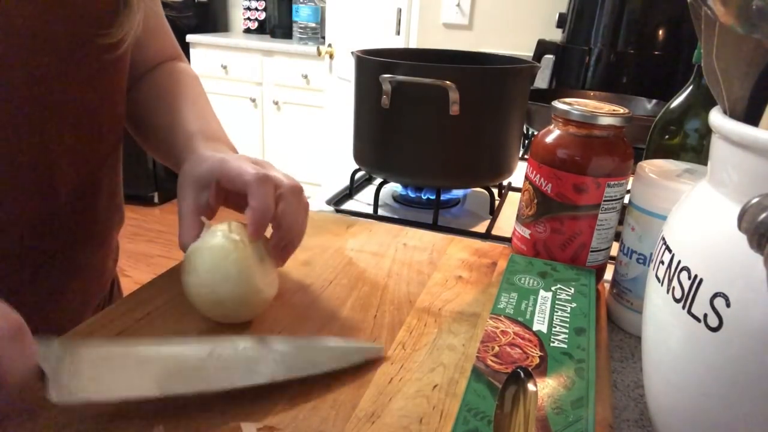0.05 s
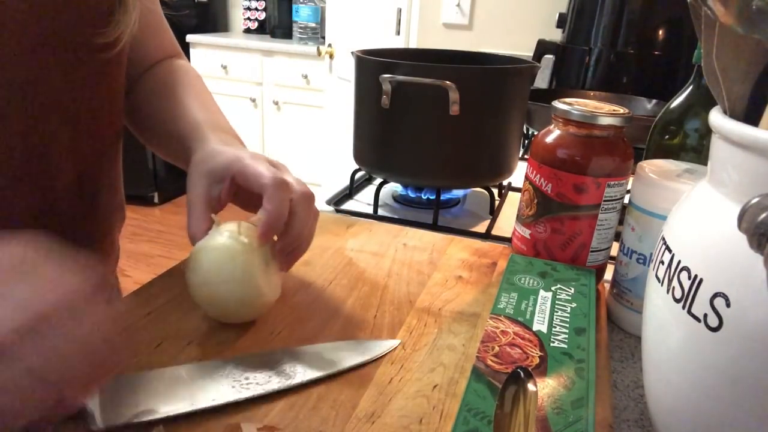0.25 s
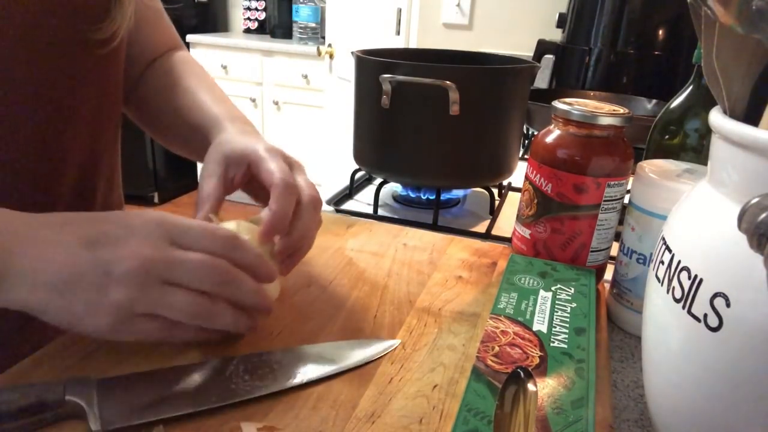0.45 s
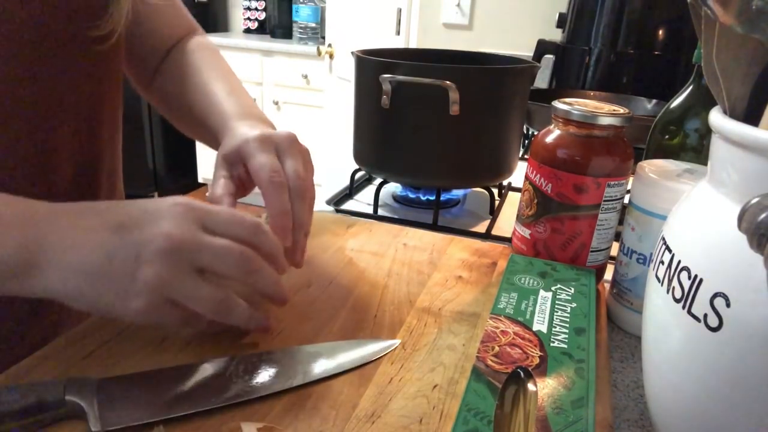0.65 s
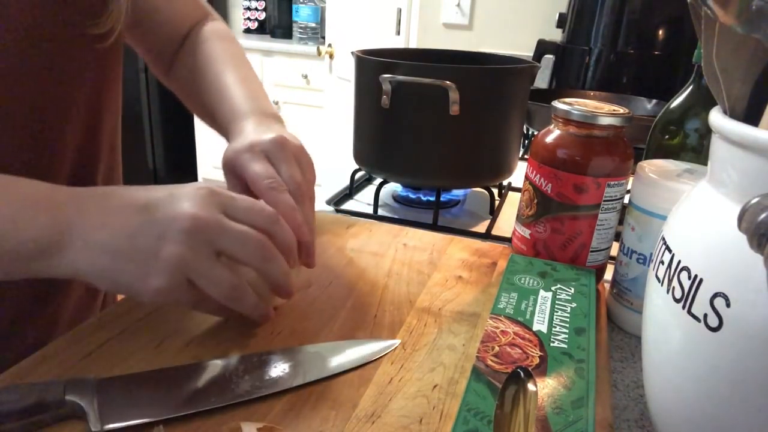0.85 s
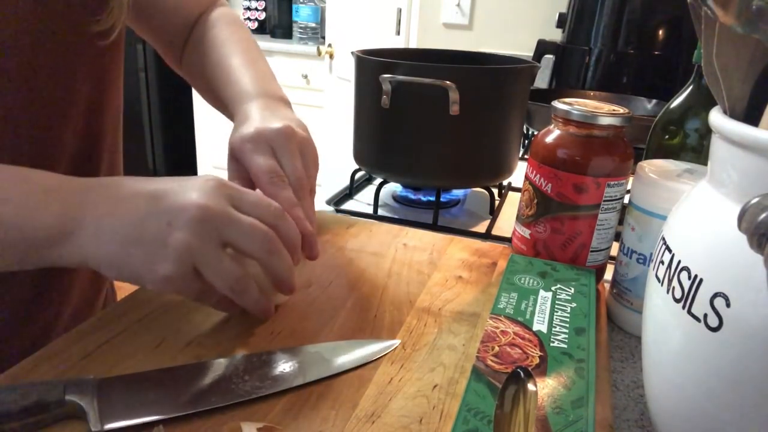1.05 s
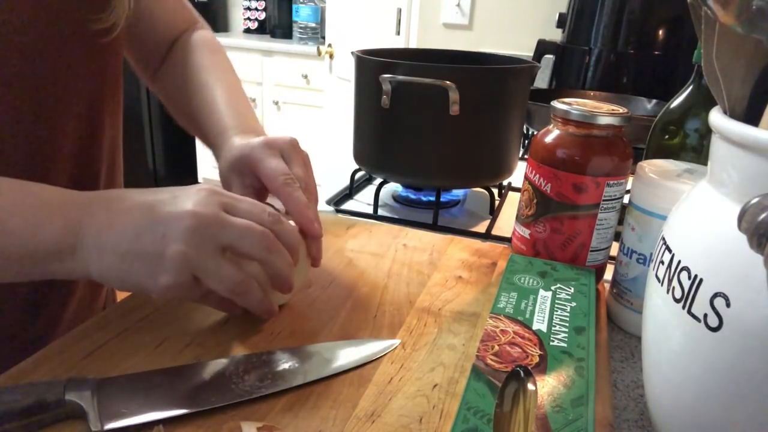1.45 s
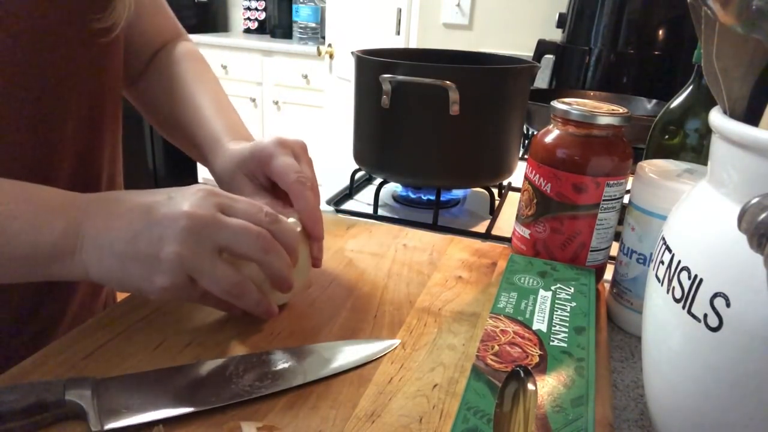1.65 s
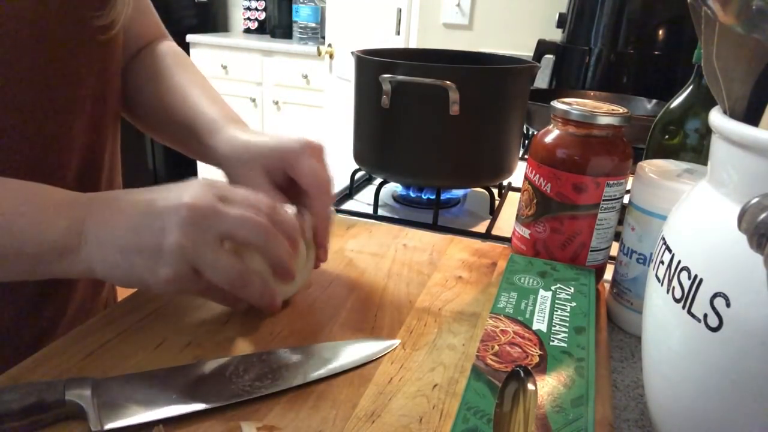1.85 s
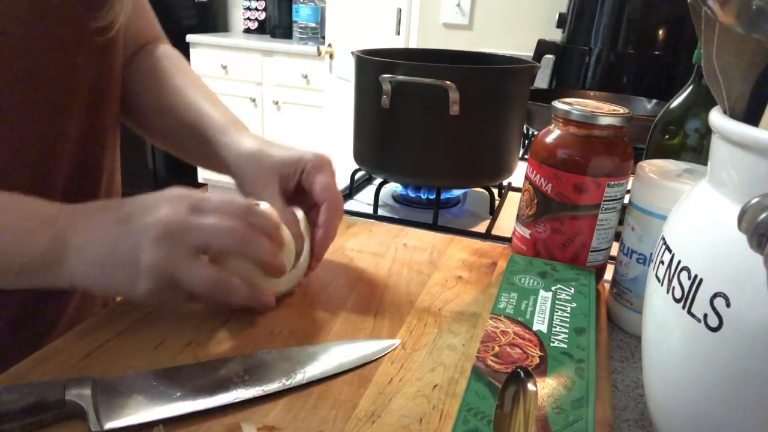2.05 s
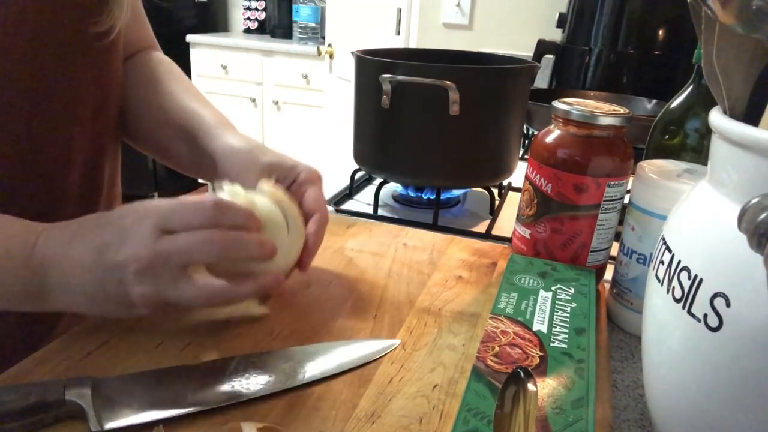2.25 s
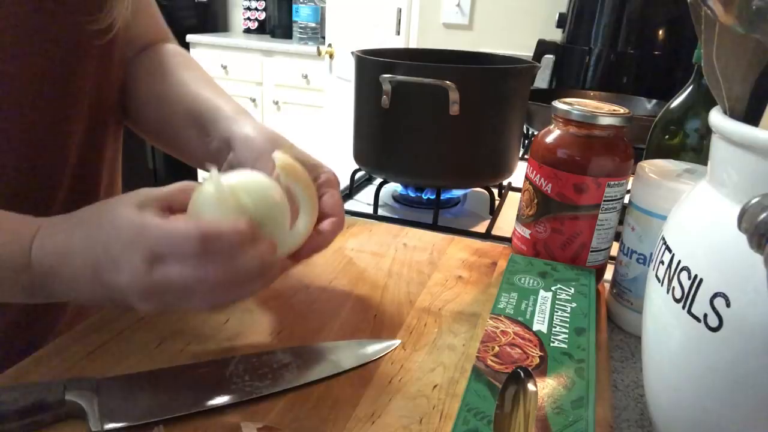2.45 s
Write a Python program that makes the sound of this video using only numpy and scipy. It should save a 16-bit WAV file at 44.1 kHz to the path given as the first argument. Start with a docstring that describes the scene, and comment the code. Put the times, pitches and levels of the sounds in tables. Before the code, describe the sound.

A kitchen knife clacks down on wood, followed by papery onion skin being peeled by hand.

```python
"""A steel kitchen knife ticks its edge on a wooden board, drops flat and rocks to rest, blade ringing.
Each hit layers a noisy clack, a low thud and the dying modes of wood and steel.
Fingers then pick at an onion: the dry skin snaps in tiny cracks, rubs and tears in short runs of
clicks, and the onion bumps dully on the board.
A small kitchen answers, with a low mains hum and a soft rumble behind."""
import sys
import numpy as np
from scipy import signal
from scipy.fft import rfft, irfft
from scipy.io import wavfile

SR = 44100
rng = np.random.default_rng(int(sys.argv[2]) if len(sys.argv) > 2 else 0)


def wav_out(sig):
    """Save sig, one row per channel (or a flat mono array), as 16-bit PCM at SR to the path in sys.argv[1]."""
    wavfile.write(sys.argv[1], SR, np.round(np.clip(np.atleast_2d(sig).T, -1, 1) * 32767).astype(np.int16))


N = 114660

# The edge ticks on the board. Each row: start in seconds, then clack, wood, blade and thud levels in dB.
EDGE_TAPS = [(0.0, -33.5, -30.5, -32, -31.5), (0.0831, -44.5, -31, -43, -42),
             (0.1221, -48, -31.5, -53.5, -42), (0.1508, -32.5, -25, -52.5, -48),
             (0.1558, -35.5, -28.5, -54, -50)]
# The knife drops flat and rocks. Each row: start in seconds, then clack, knock, clink and thud levels
# in dB, and the knock's pitch ratio.
FLAT_DROPS = [(0.2083, -19, -3.5, -28, -35, 1.028), (.2118, -24, -13, -30.5, -42, 0.97),
              (0.2232, -31.5, -32, -21, -30, 0.94), (0.229, -23.5, -3.5, -32.5, -37, .99),
              (0.243, -30, -17, -34.5, -31.5, 0.91)]
# Modes of the board under the edge, then of the knife lying on the board.
# Each row: frequency in Hz, level in dB, T60 in seconds.
TICK_MODES = [(790, -3.5, 0.04), (963, -11, 0.055), (1360, -10, 0.038), (1758, 2.5, 0.026),
              (2267, -7.5, 0.057), (2640, -9.5, 0.1), (2900, -4, 0.0264), (3359, -10.5, 0.047),
              (4573, -3.5, 0.026), (5227, -14, 0.012), (5950, -8.5, 0.043), (7800, -13, 0.064),
              (8330, -10.5, 0.0354)]
KNOCK_MODES = [(305.9, -29.5, 0.26), (603, -21.5, 0.086), (695, -18.5, 0.067), (862.4, -7, 0.085),
               (1054, -20, .04), (1160, -21, 0.047), (1524, -2, 0.037), (1616, -0.5, 0.022),
               (1890, -3.5, 0.025), (2047, -16.5, 0.022), (2614, -25, 0.088), (2860, -21, 0.045)]
# Modes of the steel blade. Each row: frequency in Hz, level ringing free in dB, level slapped flat
# in dB, free T60 in seconds.
BLADE_MODES = [(3451, -22, -12, .3), (4632, -6, -10, .25), (5642, -17, -7.5, .3), (5790, -24, -8.5, .3),
               (6818, -1, -7, .42), (6950, -18, -7, .3), (7195, -22, -8, .3), (8105, -15, -2, .36),
               (8622, -22, -10, .25), (9512, -14, -13, .15), (10402, -24, -17, .2), (11038, -11, -11, .16),
               (12400, -21, -16, .17), (13470, -29, -20, .16), (15520, -30, -26, .1)]
# Tone of the impacts. Each row: frequency in Hz, gain in dB.
CLACK_EQ = [(100, -20.5), (300, -9), (520, 1), (1200, 3), (2800, 0), (4000, -5), (6000, -9), (11000, -13),
            (16000, -21)]  # steel meeting wood
THUD_EQ = [(30, -27.5), (85, 4.5), (170, -3.5), (300, -2.5), (550, -2.5), (900, -11), (2500, -45.5),
           (16000, -74.5)]  # the board's low end
BUMP_EQ = [(60, -20), (250, -9.5), (550, 2.5), (1000, 1), (1800, -2.5), (2400, -14), (5000, -36),
           (16000, -47)]  # onion meeting wood
# The kitchen's decay. Each row: frequency in Hz, T60 in seconds.
REVERB_T60 = [(100, 0.25), (500, 0.44), (1400, 0.61), (3700, 0.56), (8000, 0.55), (16000, .35)]
# Tone of the reverb, dipped at the knife's loudest knock pitches so its tail sounds diffuse.
# Each row: frequency in Hz, gain in dB.
REVERB_EQ = [(60, 6), (620, 4.5), (860, -0.5), (1200, 3.5), (1600, -5), (2300, 1), (8000, -1), (16000, -2)]
# Tone of the background rumble. Each row: frequency in Hz, gain in dB.
RUMBLE_EQ = [(20, -16), (45, -10), (100, 6), (200, -6.5), (330, -3.5), (480, -14), (720, -17.5), (850, -7),
             (1050, -19.5), (2500, -23.5), (8000, -31.5), (16000, -45.5)]
# Partials of the mains hum. Each row: frequency in Hz, rms level in dB.
HUM_PARTIALS = [(59.6, -52.5), (119.4, -62), (179, -64.5), (239, -74), (298, -65)]
# The dry skin snaps. Each row: start in seconds, level in dB, centre in Hz, decay time constant in
# milliseconds, hollow body gain in dB.
SKIN_SNAPS = [(0.4122, -34, 6490, 0.44, 4), (0.5028, -25.5, 9000, 0.47, 0), (0.54, -43, 7490, 0.63, 5),
              (0.6566, -35, 5650, 1.4, 7.5), (0.6665, -41.5, 7600, 1.8, -8), (0.801, -44, 5000, 1.1, 5),
              (0.826, -40.5, 5160, 1.5, -4), (0.8371, -33, 5860, 0.49, -1), (0.8733, -36, 8600, 2.1, 6),
              (0.9117, -35.5, 3900, 0.48, 4), (1.1081, -34, 7840, 2.6, 5.5),
              (1.2194, -35.5, 8370, 1.16, -4), (1.226, -43.5, 11200, 0.63, -3),
              (1.2804, -42.5, 6510, 0.67, 9), (1.2971, -35, 5460, 3.5, 6.5),
              (1.3175, -39.5, 9000, 0.66, -3), (1.4368, -38, 4920, 1.6, 2), (1.494, -29, 7900, 1.5, 5),
              (1.502, -27, 6160, 0.43, -9), (1.5166, -27.5, 6070, 1.3, -5), (1.529, -26, 6770, 1, -12),
              (1.5328, -26.5, 6150, 1.3, 5), (1.538, -24, 6900, 1.2, -11), (1.5528, -30, 6370, 0.51, -16),
              (1.6678, -40, 6070, 1.2, -4), (1.727, -32.5, 5730, 0.87, 2.5), (1.736, -32.5, 6400, 1.4, -7),
              (1.8096, -41.5, 5480, 1.75, 4), (1.8246, -43, 8600, 0.75, -6), (1.8465, -31, 4700, 1.2, -2),
              (1.8562, -23, 8700, 1.4, 1), (1.8739, -26, 3000, 0.66, 14), (1.8764, -19, 5600, 0.84, -7),
              (1.895, -28.5, 11000, 1.8, -16), (1.9007, -22.5, 6600, 0.36, -22),
              (1.9049, -25.5, 5040, 1, 3), (1.9144, -28, 4550, 0.99, 6), (1.935, -23.5, 11000, 0.6, -10),
              (1.9617, -33, 7000, 0.69, -2), (1.9727, -30, 6600, 0.52, -7), (1.9762, -28, 8850, 1.8, -4),
              (2.0037, -31, 7060, 0.51, -11), (2.0167, -29.5, 6030, 0.75, 0),
              (2.0555, -27.5, 6840, 0.94, -1), (2.0949, -34.5, 5560, 1.7, 0), (2.1124, -36, 8000, 1, -2),
              (2.1286, -36.5, 7950, 0.81, 6), (2.1793, -36.5, 4740, 1, -2), (2.1906, -33.5, 6750, 0.53, -5),
              (2.199, -33, 3400, 3, 9.5), (2.223, -33.5, 9600, 0.62, -9), (2.3494, -35.5, 10000, 1.2, 6),
              (2.3595, -24.5, 3500, 1.6, 0), (2.4122, -30, 3250, 1.8, 0), (2.4999, -41, 11000, 0.41, -3),
              (2.529, -37.5, 6060, 3.9, 3.5)]
# Fingers slide on the skin, and the skin tears. Each row: start in seconds, length in seconds, opening
# level in dB, level change over the stroke in dB, the bright ring's share of the power from 0 to 1.
FINGER_RUBS = [(0.64, 1, -73.5, 1, 0), (0.79, 0.077, -63, -1, 0.18), (1.27, 0.053, -71, 4, 0.03),
               (1.545, 0.11, -56, -20, .85), (1.8, 0.051, -58, 5, 0.032), (2.17, 0.048, -60.5, 8.5, 0),
               (2.313, 0.071, -45, -9, 0.08), (2.375, 0.079, -57.5, 1.5, 0.14),
               (2.527, 0.015, -46, 2, 0.074), (2.545, .06, -55.5, -4, 0.16)]
SKIN_RIPS = [(1.519, 0.021, -34.5, 4, .85), (1.852, 0.037, -37, -1.5, 0.08), (1.893, 0.031, -34, 2, 0.07),
             (1.92, 0.113, -46.5, -5, 0.02), (2.05, 0.078, -50, -4.5, 0)]
# Tone of the onion skin. Each row: frequency in Hz, gain in dB.
SNAP_EQ = [(60, -1), (250, -1), (500, -5.5), (1500, 5), (4000, 3), (7000, 0.5), (9500, -2), (16000, 3)]
RUB_EQ = [(100, -10), (700, -7), (2500, -0.5), (6500, 0.5), (9500, -2.5), (16000, -2)]
RIP_EQ = [(60, -6), (200, -6.5), (400, -5), (700, -4.5), (1700, 2.5), (3200, -0.5), (6500, -3), (9500, -4),
          (16000, -5)]
# A bright ring near 7 kHz that colours the first rip and fades after it.
# Each row: frequency in Hz, gain in dB.
BRIGHT_RING_EQ = [(100, -19), (400, 0.5), (900, -24.5), (3000, -29), (5800, -10.5), (6700, 3), (7900, 0.5),
                  (8600, -12.5), (16000, -11)]
# The onion bumps the board and settles. Each row: start in seconds, knock level in dB, thud level in dB.
ONION_BUMPS = [(2.0633, -32, -53), (2.078, -43.5, -54), (2.087, -58, -43)]

THUD_T60_S, THUD_RISE_S = 0.069, 0.00045
SLAP_T60_S, SLAP_RISE_S, SLAP_DETUNE = 0.11, 0.0022, 0.0015
AFTER_RING_S, AFTER_RING_DB, CHOKE_DB = 0.23, -33.5, -8
SNAP_WIDTH_OCT, SNAP_SKIRT_DB, HOLLOW_BELOW_HZ = 0.54, -2.5, 2360
KNIFE_SEND_DB, ONION_SEND_DB = -12, -13.5


def amp(db):
    """Decibels to gain."""
    return 10 ** (np.asarray(db) / 20)


def unit(x):
    """Scales to rms 1."""
    return x / np.sqrt(np.mean(x ** 2) + 1e-20)


def read(points, hz):
    """Reads a table on a log-frequency axis."""
    f, value = np.transpose(points)
    return np.interp(np.log(hz + 1), np.log(f), value)


def add(mix, s, sound):
    """Mixes a sound in at a time."""
    part = mix[max(round(s * SR), 0):][:len(sound)]
    part += sound[:len(part)]


def freqs(x):
    """Frequencies of the spectrum of x."""
    return np.fft.rfftfreq(len(x), 1 / SR)


def colour(x, eq, size=4096):
    """Minimum-phase EQ, so nothing rings ahead of an attack."""
    log_gain = np.log(amp(read(eq, abs(np.fft.fftfreq(size, 1 / SR)))))
    taps = np.fft.ifft(np.exp(np.conj(signal.hilbert(log_gain)))).real[:size // 2]
    return signal.fftconvolve(x, taps)[:len(x)]


def burst(t, t60_s, rise_s):
    """A dying cluster of micro-impacts with an even spectrum and energy 1."""
    envelope = (1 - np.exp(-t / rise_s)) * np.exp(-np.log(1000) * t / t60_s)
    spectrum = rfft(rng.standard_normal(len(t)) * envelope)
    whitened = unit(irfft(spectrum / (abs(spectrum) + 1e-12), len(t)))
    cluster = whitened * np.minimum(1, envelope / envelope.max() * 2)
    return cluster / np.linalg.norm(cluster)


def blow(eq, t60_s, rise_s):
    """A coloured burst with the energy of 10 ms at rms 1."""
    hit = colour(burst(np.arange(SR // 4) / SR, t60_s, rise_s), eq)
    return hit / np.linalg.norm(hit) * np.sqrt(SR / 100)


def ring(modes, t, scatter_db):
    """Dying modes of alternating polarity; each hit weights them a little differently."""
    out = np.zeros(len(t))
    for k, (hz, db, t60_s) in enumerate(modes):
        envelope = amp(db + scatter_db * rng.standard_normal()) * np.exp(-np.log(1000) * t / t60_s)
        out += (-1) ** k * envelope * np.sin(2 * np.pi * hz * t)
    return out


def steel_on_wood(clack_db, thud_db):
    """The clack of the contact over the board's low thud."""
    clack = amp(clack_db) * blow(CLACK_EQ, t60_s=0.042, rise_s=0.0005)
    return clack + amp(thud_db) * blow(THUD_EQ, THUD_T60_S, THUD_RISE_S)


def bending_wave(t, from_hz=1100, to_hz=374, glide_s=0.007):
    """A hollow, falling knock: the low notes of a bending wave in the blade arrive late."""
    hz = to_hz + (from_hz - to_hz) * np.exp(-t / glide_s)
    swell = 2 * (t / glide_s) ** 2 * np.exp(-1.5 * t / glide_s)
    return amp(-3.5) * swell * np.sin(2 * np.pi * np.cumsum(hz) / SR)


def chatter(t, depth=0.78, cutoff_hz=89):
    """The flat blade rattles on the wood: a quick random wobble in one mode's strength."""
    pole = [1, -np.exp(-2 * np.pi * cutoff_hz / SR)]
    wobble = signal.lfilter([1], np.convolve(pole, pole), rng.standard_normal(len(t)))
    return 1 + depth * unit(wobble)


def knife():
    """The edge ticks, each hit choking the last ring; the knife slaps flat and the blade rings on."""
    out, t = np.zeros(N), np.arange(SR) / SR
    free_modes = [(hz, db, t60_s) for hz, db, _, t60_s in BLADE_MODES]
    attack = 1 - np.exp(-t / 0.0006)
    slap_attack = 1 - np.exp(-t / SLAP_RISE_S)
    next_starts = [row[0] for row in [*EDGE_TAPS[1:], FLAT_DROPS[0]]]
    for (start, clack_db, wood_db, blade_db, thud_db), next_start in zip(EDGE_TAPS, next_starts):
        add(out, start, steel_on_wood(clack_db, thud_db))
        tick = attack * ring(TICK_MODES, t, scatter_db=4) + bending_wave(t)
        choke = amp(CHOKE_DB * np.clip((start + t - next_start) / SLAP_RISE_S, 0, 1))
        blade = choke * ring(free_modes, t, scatter_db=6.5)
        add(out, start, amp(wood_db) * tick + amp(blade_db) * blade)
    for start, clack_db, knock_db, clink_db, thud_db, pitch in FLAT_DROPS:
        pressed_modes = [(hz * (1 + SLAP_DETUNE * rng.standard_normal()), db, SLAP_T60_S)
                         for hz, _, db, _ in BLADE_MODES]
        add(out, start, steel_on_wood(clack_db, thud_db))
        knock = attack * ring(KNOCK_MODES, pitch * t, scatter_db=1.5)
        clink = slap_attack * sum(chatter(t) * ring([mode], t, scatter_db=2) for mode in pressed_modes)
        add(out, start, amp(knock_db) * knock + amp(clink_db) * clink)
    add(out, AFTER_RING_S, amp(AFTER_RING_DB) * ring(free_modes, t, scatter_db=3.5))
    return out


def room_tone(rumble_db=-55.5):
    """Mains hum over the soft rumble and hiss of the kitchen."""
    t = np.arange(N) / SR
    hum = sum(amp(db) * np.sqrt(2) * np.sin(2 * np.pi * (hz * t + rng.random()))
              for hz, db in HUM_PARTIALS)
    rumble = irfft(rfft(rng.standard_normal(N)) * amp(read(RUMBLE_EQ, freqs(t))), N)
    return hum + amp(rumble_db) * unit(rumble)


def kitchen_reverb(send, predelay_s=0.0028):
    """The kitchen's diffuse tail, each band dying at its own speed."""
    hz, t, bands = signal.stft(rng.standard_normal(SR), SR, nperseg=256)
    decay = np.exp(-np.log(1000) * t / read(REVERB_T60, hz)[:, None])
    tail = signal.istft(bands * amp(read(REVERB_EQ, hz))[:, None] * decay, SR)[1]
    tail *= np.clip(np.arange(len(tail)) / SR / predelay_s - 1, 0, 1)
    return signal.fftconvolve(send, tail / np.linalg.norm(tail))[:N]


def flake_eq(eq, ripple_db=3):
    """Gives an EQ the chance peaks and dips of one small flake."""
    hz = np.geomspace(40, SR / 2, 110)
    return np.c_[hz, read(eq, hz) + ripple_db * rng.standard_normal(len(hz))]


def skin_snaps():
    """A flake buckles with a brief pitched crack, and the dry shell around it shivers."""
    out, t = np.zeros(N), np.arange(4096) / SR
    hz = np.geomspace(40, SR / 2, 60)
    for start, db, centre_hz, decay_ms, body_db in SKIN_SNAPS:
        crack = burst(t, t60_s=np.log(1000) * decay_ms / 1000, rise_s=1 / SR)
        shiver = amp(-6) * burst(t, t60_s=0.052, rise_s=0.002)
        peak = np.exp(-0.5 * (np.log2(hz / centre_hz) / SNAP_WIDTH_OCT) ** 2) + amp(SNAP_SKIRT_DB)
        hollow_db = body_db / (1 + (hz / HOLLOW_BELOW_HZ) ** 4)
        tone_db = read(SNAP_EQ, hz) + hollow_db + 20 * np.log10(peak)
        snap = colour(crack + shiver, flake_eq(np.c_[hz, tone_db]))
        snap *= np.sqrt(SR / 1000) / np.linalg.norm(snap)  # the energy of 1 ms at rms 1
        add(out, start, amp(db) * snap)
    return out


def fractures(per_s, spread_db, clump_db=3.5, clump_hz=160):
    """Tiny fractures: random clicks of uneven size, swelling in clumps."""
    size = amp(spread_db * np.minimum(rng.exponential(1, N), 4))
    clumps = unit(irfft(rfft(rng.standard_normal(N)) * (freqs(size) < clump_hz), N))
    return size * amp(clump_db * clumps) * rng.choice([-1, 1], N) * (rng.random(N) < per_s / SR)


def skin_strokes(strokes, eq, clicks_per_s, spread_db, flakes=6, edge_s=0.0043):
    """Rubs or rips: several flakes crackle under each pull of the fingers, blended with a bright ring."""
    out, t = np.zeros(N), np.arange(N) / SR
    crackle = unit(sum(colour(fractures(clicks_per_s / flakes, spread_db), flake_eq(eq))
                       for _ in range(flakes)))
    bright = unit(colour(fractures(clicks_per_s, spread_db), BRIGHT_RING_EQ))
    for start, length, db, change_db, ring_share in strokes:
        gate = np.clip(np.minimum(t - start, start + length - t) / edge_s + 0.5, 0, 1)
        fader = amp(db + change_db * np.clip((t - start) / length, 0, 1))
        out += gate * fader * (np.sqrt(1 - ring_share) * crackle + np.sqrt(ring_share) * bright)
    return out


def onion_bump():
    """The onion knocks dully on the wood as its outer layer gives, then its weight comes down."""
    out = np.zeros(N)
    for start, knock_db, thud_db in ONION_BUMPS:
        add(out, start, amp(knock_db) * blow(BUMP_EQ, t60_s=0.036, rise_s=0.00079))
        add(out, start, amp(thud_db) * blow(THUD_EQ, THUD_T60_S, THUD_RISE_S))
    return out


def scene():
    """Knife, then onion, both sent to the kitchen reverb over a bed of room tone, in mono."""
    steel = knife()
    onion = skin_snaps()
    onion += skin_strokes(SKIN_RIPS, RIP_EQ, clicks_per_s=3500, spread_db=3)
    onion += skin_strokes(FINGER_RUBS, RUB_EQ, clicks_per_s=4000, spread_db=4.5)
    onion += onion_bump()
    reverb = kitchen_reverb(amp(KNIFE_SEND_DB) * steel + amp(ONION_SEND_DB) * onion)
    return (steel + onion + reverb + room_tone())[None]


def record(dry):
    """The loudest peaks clip, then a 16 kHz low-pass trims the top."""
    clipped = np.clip(dry, -0.92, 0.92)
    taps = signal.firwin(255, 16000, window=("kaiser", 9), fs=SR)
    return signal.oaconvolve(clipped, taps[None], "same")


dry = scene()
out = record(dry)
wav_out(out)
```